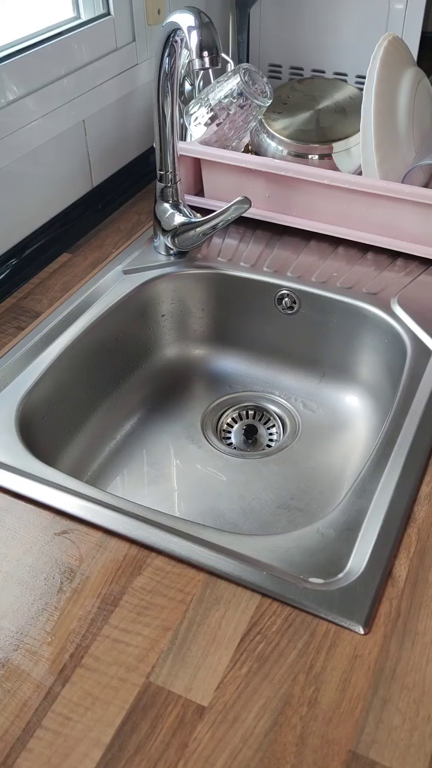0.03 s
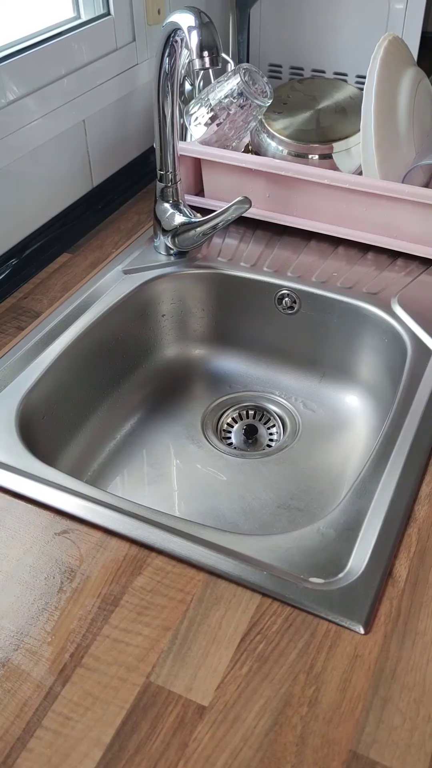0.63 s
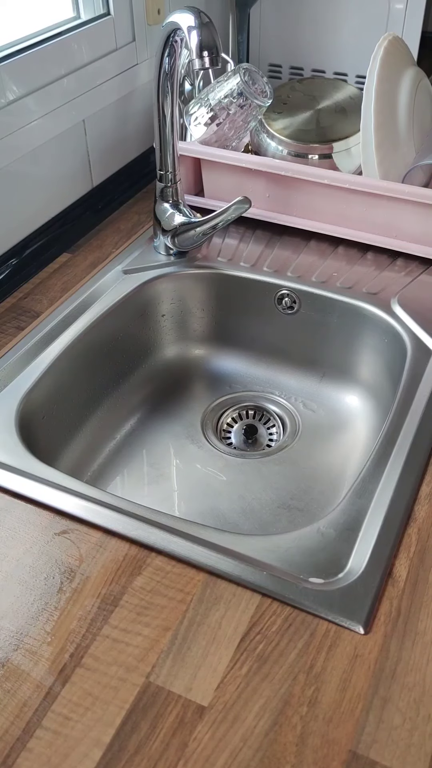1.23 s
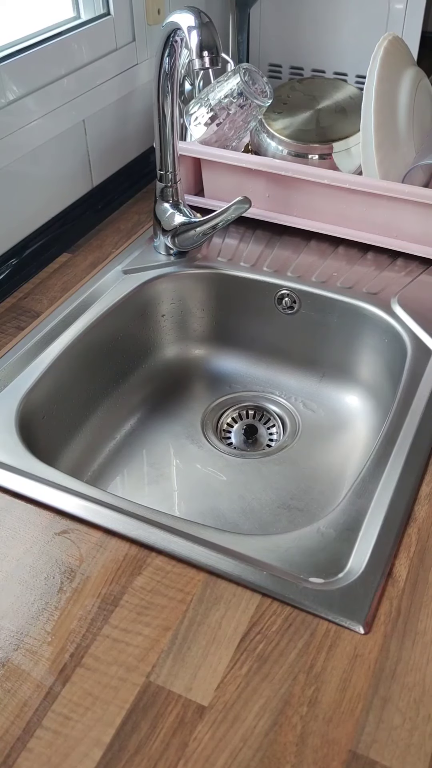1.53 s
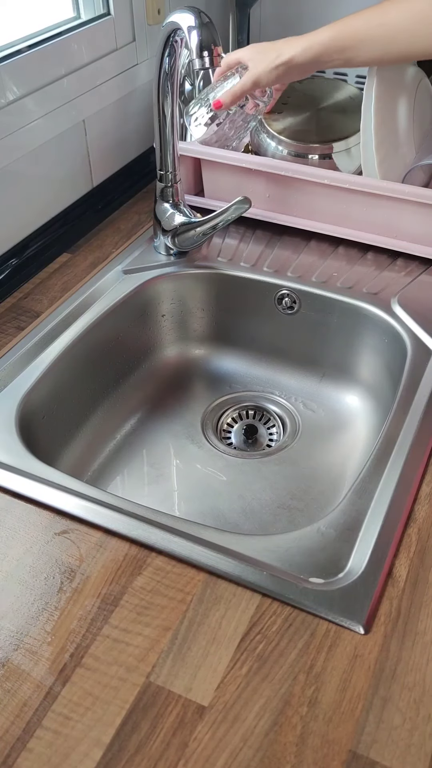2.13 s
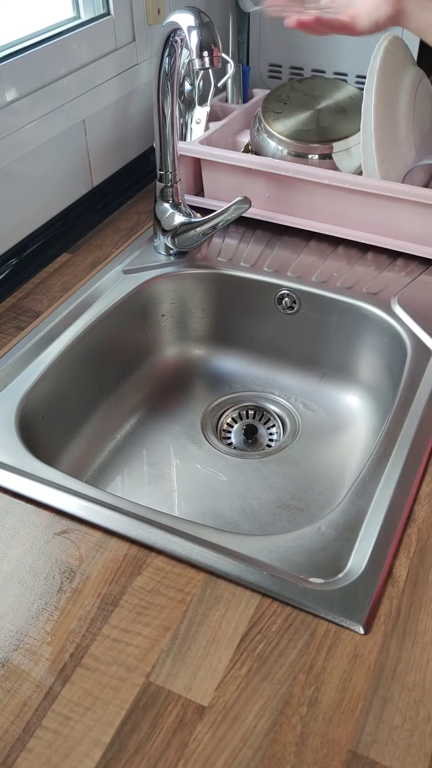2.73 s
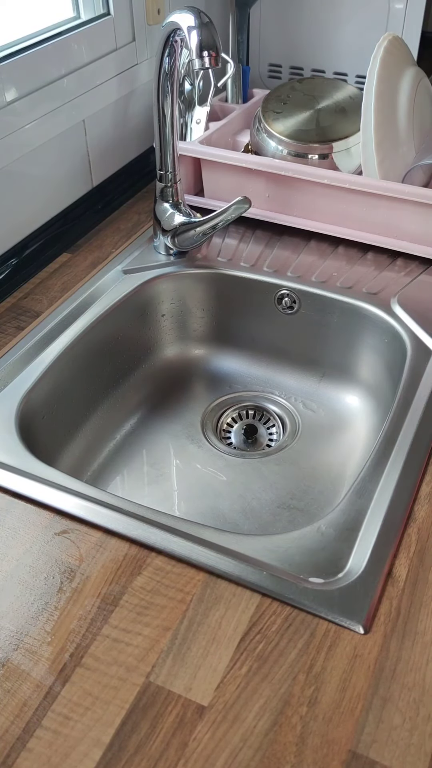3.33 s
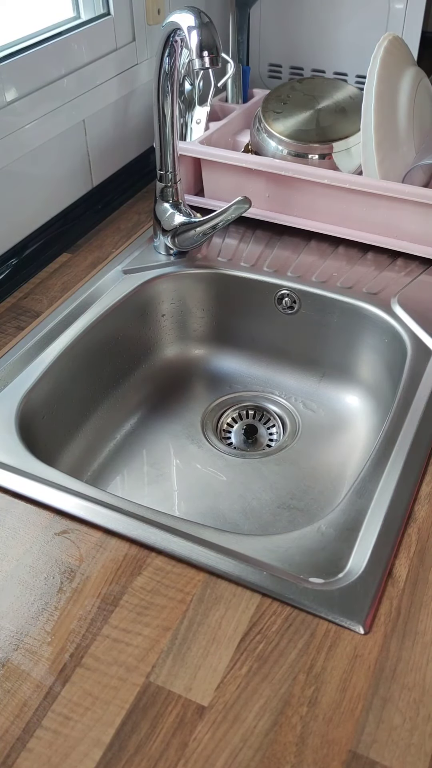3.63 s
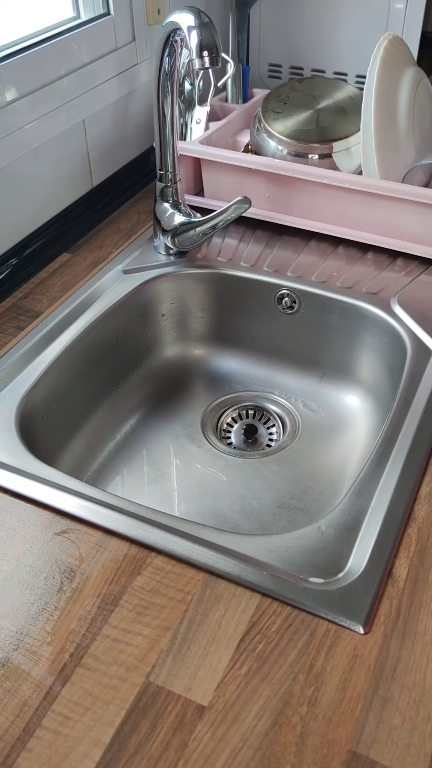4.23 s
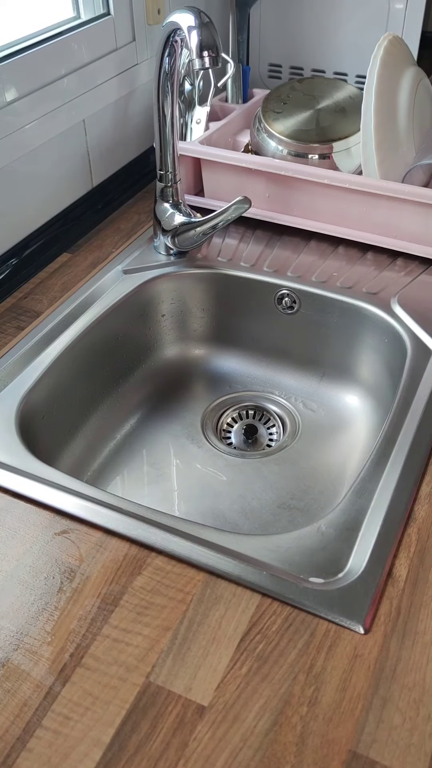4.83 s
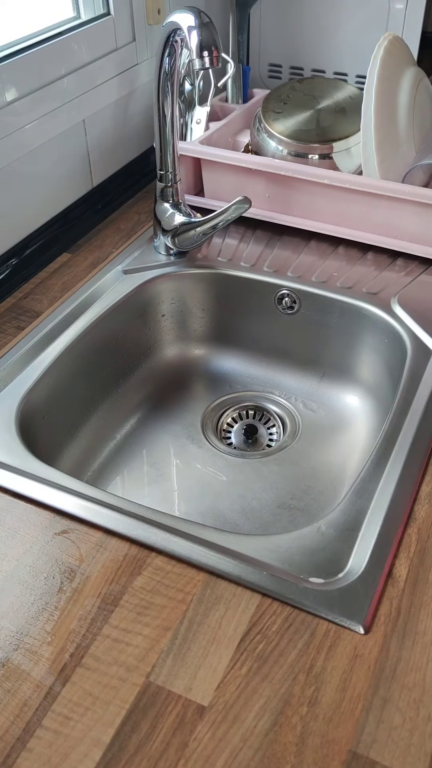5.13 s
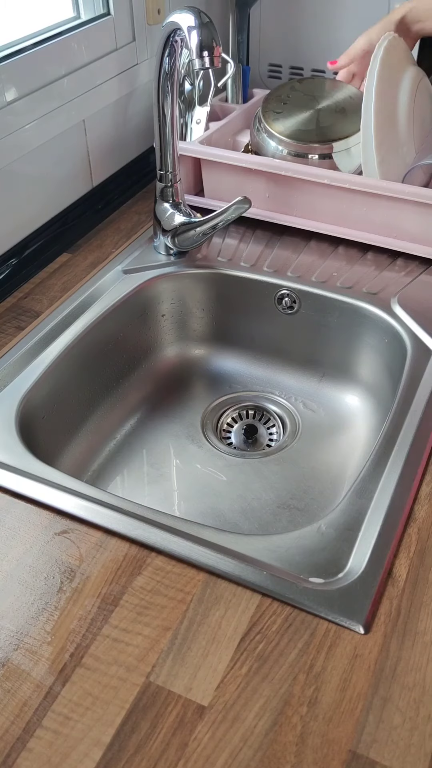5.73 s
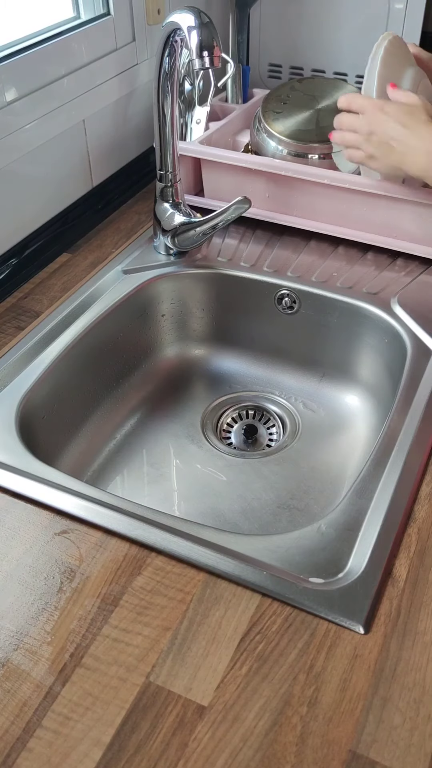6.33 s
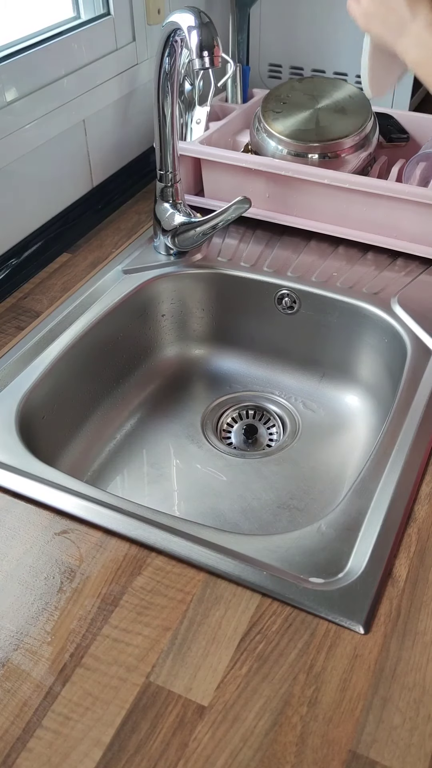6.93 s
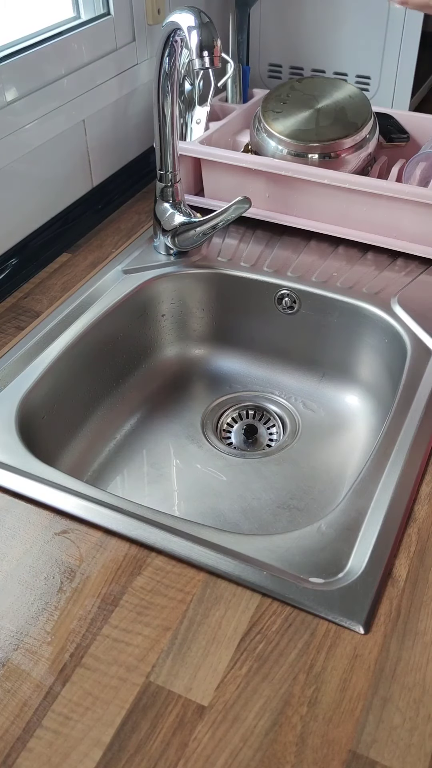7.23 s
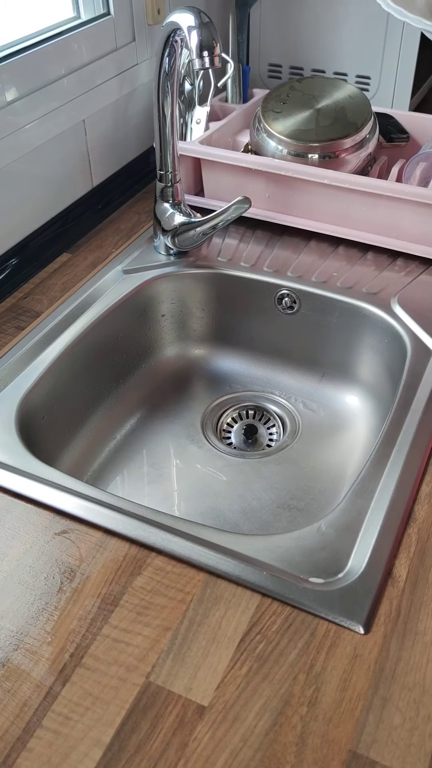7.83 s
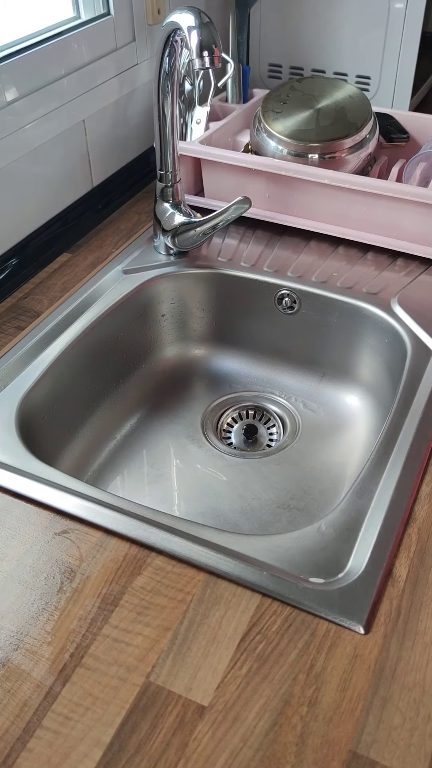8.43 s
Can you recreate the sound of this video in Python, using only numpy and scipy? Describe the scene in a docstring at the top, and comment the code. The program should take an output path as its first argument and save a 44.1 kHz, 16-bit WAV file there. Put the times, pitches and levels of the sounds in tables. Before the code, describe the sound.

A small tiled kitchen is heard close up in stereo, with soft room noise and a faint, steady fridge hum throughout. At about 0.6 seconds a cupboard door thumps slightly to the right, and cups and a wire shelf jingle and rattle until 1.3 seconds. At 2.3 seconds a plastic drainer gives a light knock as a glass is lifted out. After a pause, a shelf board thuds at 4.1 seconds, and at 4.3 the glass is set down with a quick, bright, ringing chatter, the loudest sound. From about 6.3 seconds, slightly to the left, a plate scrapes and bumps its way out of the drainer, and its rim clacks sharply at 7 seconds. A faint scrape and a light tap follow around 7.4 seconds. The plate clacks onto a stack at 7.8 seconds and settles with a small knock just after 8.

```python
"""A small tiled kitchen, beside the steel sink, on a stereo pair: a plastic drainer is being emptied.
To the right a cupboard door thumps, cups and a wire shelf jingle. A glass is lifted out and chatters,
ringing, on a shelf board. To the left a plate scrapes out of the drainer, its rim clacks, it is tapped
in the hand and laid on a stack. Each blow is a short knock plus ringing modes. A fridge hums faintly."""
import sys
import numpy as np
from scipy import signal
from scipy.fft import rfft, irfft, next_fast_len
from scipy.io import wavfile

SR = 44100
rng = np.random.default_rng(int(sys.argv[2]) if len(sys.argv) > 2 else 0)


def to_wav(s):
    """Save 16-bit WAV."""
    ch = np.atleast_2d(s).T  # columns
    pcm = np.round(np.clip(ch, -1, 1) * 32767)  # PCM
    wavfile.write(sys.argv[1], SR, pcm.astype(np.int16))


N = 382788
SCENE_FFT, SIZE = next_fast_len(N, real=True) // 2 * 2, 49152  # SIZE holds one blow and its tail
T, HZ = np.arange(SIZE) / SR, np.fft.rfftfreq(SIZE, 1 / SR) + 1
SIDES = np.array([[1], [-1]])  # left, right

def undb(db):
    """Decibels to gain."""
    return 10 ** (np.asarray(db) / 20)

def colour(points, hz):
    """Gain at hz of a spectrum of (Hz, dB) points."""
    f, db = np.transpose(points)
    return undb(np.interp(np.log(hz), np.log(f), db))

def causal(points):
    """Log response of a body that answers only after it is struck."""
    cepstrum = irfft(np.log(colour(points, HZ)))
    cepstrum[1:SIZE // 2] *= 2
    cepstrum[SIZE // 2 + 1:] = 0
    return rfft(cepstrum)

def likeness(hz, spacing_m=0.17):
    """Two microphones hear a room alike in the bass, hardly at all above."""
    return .95 * np.sinc(2 * hz * spacing_m / 343)

def stereo(mid, side, hz):
    """Left and right from unrelated mid and side."""
    return mid * np.sqrt(1 + likeness(hz)) + side * np.sqrt(1 - likeness(hz)) * SIDES

def diffuse(size):
    """Spectrum of noise reaching the microphones from all sides."""
    mid, side = rfft(rng.standard_normal((2, size)))
    return stereo(mid, side, np.fft.rfftfreq(size, 1 / SR))

# Room tone: (frequency [Hz], relative level [dB])
ROOM_TONE = [(12, -29.5), (20, 0.5), (70, -13.5), (92, -10), (133, -11), (250, -18.5), (380, -16.5),
             (597, -20), (881, -24), (1010, -25.5), (2500, -33.5), (3600, -31.5), (4310, -34.5),
             (6300, -35), (7900, -32.5), (9500, -39), (15500, -40)]
def room_air(level_db=-57.5):
    """Steady air all round the microphones."""
    air = irfft(diffuse(SCENE_FFT) * colour(ROOM_TONE, np.fft.rfftfreq(SCENE_FFT, 1 / SR) + 0.12))[:, :N]
    return undb(level_db) * air / air.std()

# Hum and compressor whine: (frequency [Hz], relative level [dB])
FRIDGE_TONES = [(97, -70.5), (393, -75), (495, -89.5), (592, -78), (985, -79.5), (3601, -80.5), (3650, -82),
                (3747, -83), (4980, -87), (6115, -88.5)]
def fridge(gain_db=2):
    """Even tones reach each microphone in their own phase."""
    t, hum = np.arange(N) / SR, 0
    for hz, db in FRIDGE_TONES:
        phase = 2 * np.pi * rng.random() + np.arccos(likeness(hz)) / 2 * SIDES
        hum += undb(db + gain_db) * np.sqrt(2) * np.sin(2 * np.pi * hz * t + phase)
    return hum

# Reverberation off the tiles: (frequency [Hz], T60 [s])
ROOM_DECAY = [(150, 0.61), (400, 0.6), (1000, 0.76), (2200, 0.7), (4000, 0.75), (8000, 0.54), (14000, 0.23)]
def kitchen(direct_db, lag_ms, build_s=0.002, sparse_s=0.037):
    """Path to the microphones: direct sound, reflections, dense tail. Positive lag is to the right."""
    noise, (centres, t60s) = diffuse(SIZE), np.transpose(ROOM_DECAY)
    bands = [np.interp(np.log(HZ), np.log(centres), row) for row in np.eye(len(centres))]
    tail = sum(irfft(noise * band) * undb(-60 * T / t60) for band, t60 in zip(bands, t60s))
    reflections = np.exp(.7 * np.repeat(rng.standard_normal(SIZE // 32), 32) * np.exp(-T / sparse_s))
    tail *= reflections * (1 - np.exp(-T / build_s))
    delay_s = (1 + SIDES * lag_ms / 2) / 1000
    direct = np.sinc((T - delay_s) * SR) * (T < 2 * delay_s)
    return rfft(tail / np.sqrt(np.sum(tail ** 2) / 2) + undb(direct_db) * direct)

def unit(x):
    """Give each channel the energy of 0.1 s at full level."""
    return x / np.sqrt(np.sum(x ** 2, axis=-1, keepdims=True) * 10 / SR)

def ringing(modes, room, t60_s):
    """Each mode as heard in the room; higher ones die sooner."""
    rings = []
    for hz, _ in modes:
        t60 = t60_s * np.sqrt(modes[0][0] / hz)
        push = 1 - np.exp(-T * hz)  # a mode takes about a cycle to get going
        mode = push * np.sin(2 * np.pi * hz * T) * undb(-60 * T / t60)
        left, right = unit(irfft(room * rfft(mode)))
        rings.append(stereo(unit(left + right), unit(left - right), hz))
    return np.array(rings)

def spot(modes, favoured_hz, lift_db=10, reach_octaves=.2, scatter_db=1.2):
    """Mode gains for one blow: the spot it lands on may favour some."""
    hz, db = np.transpose(modes)
    nearness = sum(np.exp(-(np.log2(hz / f) / reach_octaves) ** 2) for f in favoured_hz)
    return undb(db + lift_db * nearness + scatter_db * rng.standard_normal(len(modes)))

def struck(hits, modes, body, room, knock_s, t60_s):
    """A blow knocks the body and rings its modes; harder contact is brighter."""
    out = np.zeros((2, N + SIZE))
    rings, shell = ringing(modes, room, t60_s), room * np.exp(causal(body))
    tilt = causal([(200, 0), (12800, 6)])  # 1 dB per octave
    for s, knock_db, ring_db, bright, *favoured_hz in hits:
        contact = np.exp(bright * tilt)
        burst = rng.standard_normal(SIZE) * np.exp(-T / knock_s)
        knock = irfft(shell * contact * rfft(burst))
        ring = irfft(rfft(np.tensordot(spot(modes, favoured_hz), rings, 1)) * contact)
        start = int((s - .001) * SR)
        out[:, start:start + SIZE] += undb(knock_db) * unit(knock) + undb(ring_db) * unit(ring)
    return out[:, :N]

def bounce(hits, gap_s, count=2, brighten=1.65):
    """What lands hops on at even gaps, each contact weaker and brighter."""
    return [(s + k * gap_s, knock - k * loss, ring - k * loss, bright + k * brighten, *favoured_hz)
            for s, knock, ring, bright, loss, *favoured_hz in hits for k in range(count)]

# Door blows: (time [s], knock [dB], ring [dB], tilt [dB/octave], bounce loss [dB])
DOOR_BLOWS = [(.607, -38, -39.5, -2.5, 12), (.620, -33, -38, -2.3, 9.7), (.656, -36.5, -48, -0.39, 14)]
# Its modes and knock spectrum: (frequency [Hz], level [dB])
DOOR_RING = [(119, -17), (164, -13), (325, -6), (381, -1), (566, -3), (661, -6)]
DOOR_KNOCK = [(40, -12), (90, -11), (150, -8), (270, -10.5), (375, 10.5), (480, -6.5), (650, 5.5),
              (900, -10), (1350, -8.5), (1900, -16.5), (3000, -20.5), (6000, -53)]
def cupboard_door(room):
    """The door thumps; its low modes die fast."""
    return struck(bounce(DOOR_BLOWS, .02), DOOR_RING, DOOR_KNOCK, room, knock_s=.004, t60_s=.04)

# Cup and wire blows: (time [s], knock [dB], ring [dB], tilt [dB/octave], bounce loss [dB])
CUP_BLOWS = [(.691, -39.5, -34.5, -0.91, 5)]
WIRE_BLOWS = [(.969, -43, -51.5, -2, 5.7), (1.122, -37, -42.5, -2, 2.7), (1.24, -49, -52, -11, 7.4)]
# Their modes and shared knock spectrum: (frequency [Hz], level [dB])
CUP_RING = [(660, -12), (1701, -20), (2471, -22), (4107, -13), (4194, 0), (7375, -9), (8123, -18),
            (9695, -23), (11340, -18), (12860, -28)]
WIRE_RING = [(2044, -13), (2272, -10), (4210, -4), (4522, 0), (4610, -5), (4856, -9), (7461, -8),
             (7919, -4), (11632, -12), (12920, -16)]
WIRE_KNOCK = [(120, -4), (240, -11), (400, -6.5), (700, -1), (1400, 1), (2200, 7), (3600, -8.5), (4500, 4),
              (6200, -25), (7800, 2.5), (9100, -51), (9900, -12), (10600, -29), (11500, -24), (14000, -41)]
def cups_and_shelf(room):
    """Cups and wire shelf jingle in quick bounces."""
    cups = struck(bounce(CUP_BLOWS, .013, count=3), CUP_RING, WIRE_KNOCK, room, knock_s=.043, t60_s=.21)
    rattle = bounce(WIRE_BLOWS, .017, count=4)
    return cups + struck(rattle, WIRE_RING, WIRE_KNOCK, room, knock_s=.0055, t60_s=.08)

# Board blows: (time [s], knock [dB], ring [dB], tilt [dB/octave], bounce loss [dB])
BOARD_BLOWS = [(.982, -54, -52, 6.5, 25), (1.127, -46.5, -66, -3.5, 1.5), (4.121, -39.5, -48, -0.5, 16),
               (4.380, -38.5, -53, 8, 11)]
# Its knock spectrum: (frequency [Hz], level [dB])
BOARD_KNOCK = [(40, -21), (90, -6), (140, 7), (250, -12.5), (400, 8), (600, -5.5), (900, -15), (1500, -26),
               (4000, -57.5), (15000, -90.5)]
def shelf_board(room):
    """The board thuds with the same modes as the door."""
    return struck(bounce(BOARD_BLOWS, .014), DOOR_RING, BOARD_KNOCK, room, knock_s=.006, t60_s=.12)

# Glass blows: (time [s], knock [dB], ring [dB], tilt [dB/octave], favoured mode [Hz])
GLASS_BLOWS = [(2.321, -79, -47, -4, 3350), (4.300, -30, -21, 1.5, 1700), (4.310, -29, -31.5, 1, 9000),
               (4.330, -28, -17.5, -0.5, 1724), (4.347, -31, -26, 4, 7289), (4.367, -33, -24.5, -1, 4108),
               (4.390, -35.5, -26.5, -3, 2407)]
# Its modes and knock spectrum: (frequency [Hz], level [dB])
GLASS_RING = [(1558, -21), (1700, -3), (2335, -19), (2503, -15), (3435, -27), (4108, -11), (5345, -17),
              (7068, -21), (7289, -8.5), (8084, -19), (9004, -22), (10184, -22), (11209, -21), (12758, -24),
              (14170, -29)]
GLASS_KNOCK = [(130, -3.5), (250, -10), (570, -0.5), (820, -8), (1100, -3.5), (1700, 7.5), (2100, 0),
               (3500, -6.5), (6200, -12.5), (7800, 0.5), (8800, -12.5), (10000, -14), (11800, -29.5),
               (15500, -44.5)]
def glass(room):
    """A hand-held glass rings when lifted and chatters when set down."""
    return struck(GLASS_BLOWS, GLASS_RING, GLASS_KNOCK, room, knock_s=.0026, t60_s=.18)

# Drainer blows: (time [s], knock [dB], ring [dB], tilt [dB/octave], bounce loss [dB])
RACK_BLOWS = [(2.321, -41, -43.5, 0.3, 14)]
# Its modes and knock spectrum: (frequency [Hz], level [dB])
RACK_RING = [(371, 0), (452, -1), (685, -5), (1066, -11), (1300, -8)]
RACK_KNOCK = [(50, 0.5), (130, 6.5), (220, -2.5), (400, 2), (850, -1.5), (1400, 1.5), (2400, -8.5),
              (4000, -16.5), (7500, -13.5), (9300, -19), (9900, -7.5), (10600, -22), (15000, -28)]
def drainer_knock(room):
    """The plastic knocks as the glass leaves it."""
    return struck(bounce(RACK_BLOWS, .015), RACK_RING, RACK_KNOCK, room, knock_s=.0019, t60_s=.068)

# Pulls along the drainer's ribs: (time [s], length [s], peak level [dB])
PLATE_PULLS = [(6.34, 0.16, -53.5), (6.565, 0.082, -48.5), (6.729, 0.079, -37.5), (7.187, 0.24, -55)]
# Spectrum of plate on drainer: (frequency [Hz], level [dB])
PLATE_KNOCK = [(30, -4), (55, -18), (85, 2), (170, -0.5), (260, 1.5), (430, -2.5), (520, -11), (900, 0.5),
               (1200, -9), (2200, -13.5), (3200, -15.5), (7300, -15.5), (9500, -32), (15000, -44)]
def plate_scrape(room, slips_per_s=500, scatter_db=4, rise_db_per_s=10, fall_db_per_s=397):
    """China sticks and slips on plastic in dense clicks; a low rumble swells with the scrape."""
    t, force = np.arange(N) / SR, 0
    for s, length, db in PLATE_PULLS:
        past_peak_s = t - s - length
        force += (t > s) * undb(db - np.maximum(-rise_db_per_s * past_peak_s, fall_db_per_s * past_peak_s))
    slips = (rng.random(N) < slips_per_s / SR) * rng.choice([-1, 1], N)
    slips = slips * undb(scatter_db * rng.standard_normal(N))
    click = irfft(room * np.exp(causal(PLATE_KNOCK)))
    click /= np.sqrt(np.sum(click ** 2) / 2)
    scrape = signal.fftconvolve((force * slips / slips.std())[None], click, axes=1)[:, :N]
    low_band = signal.butter(2, [44, 72], "bandpass", fs=SR, output="sos")
    rumble = signal.sosfilt(low_band, rng.standard_normal(N))
    return scrape + undb(-5) * force * rumble / rumble.std()

# Rim and plate blows: (time [s], knock [dB], ring [dB], tilt [dB/octave], bounce loss [dB])
RIM_BLOWS = [(6.444, -58, -58, -2.5, 16), (6.98, -30.5, -34, -1.5, 7.7)]
PLATE_BLOWS = [(6.606, -44.5, -44, 0.25, 33), (6.706, -43.5, -46.5, 0.41, 4.4)]
# Rim modes and knock spectrum: (frequency [Hz], level [dB])
RIM_RING = [(781, -6), (946, -3), (2099, -3), (2784, -7), (3480, -3), (6325, -12), (6880, -3), (7892, -5),
            (10540, -14)]
RIM_KNOCK = [(130, -13), (220, -23), (371, 6), (450, -19.5), (677, 6.5), (974, 2.5), (1300, -5), (2800, -3),
             (4200, -11), (7090, 2.5), (9500, -8), (15500, -31)]
def plate_clacks(room):
    """The plate bumps the drainer and its rim clacks."""
    bumps = struck(bounce(PLATE_BLOWS, .021), RACK_RING, PLATE_KNOCK, room, knock_s=.0042, t60_s=.095)
    return bumps + struck(bounce(RIM_BLOWS, .013), RIM_RING, RIM_KNOCK, room, knock_s=.0017, t60_s=.051)

# Taps: (time [s], knock [dB], ring [dB], tilt [dB/octave], bounce loss [dB], favoured mode [Hz])
TAP_BLOWS = [(6.842, -39, -39.5, 0, 6, 673), (7.423, -41, -44.5, -0.08, 8.2, 920)]
# Held plate's modes and knock spectrum: (frequency [Hz], level [dB])
TAP_RING = [(673, -1), (910, -10), (1922, -8), (2180, -4), (2293, -2), (2400, -5), (7311, -14)]
TAP_KNOCK = [(250, -21), (520, -14), (850, 5), (1250, -5), (2300, 6.5), (3100, -11.5), (4300, -15),
             (7200, -7.5), (8000, -17), (14000, -54)]
def plate_taps(room):
    """Tapped in the hand, the plate rings briefly."""
    return struck(bounce(TAP_BLOWS, .005), TAP_RING, TAP_KNOCK, room, knock_s=.0016, t60_s=.073)

# Stack blows: (time [s], knock [dB], ring [dB], tilt [dB/octave], bounce loss [dB])
STACK_BLOWS = [(7.832, -31, -34, -0.55, 19), (8.025, -50.5, -66, -1.3, 13), (8.078, -40, -62, -0.25, 37)]
# Its modes and knock spectrum: (frequency [Hz], level [dB])
STACK_RING = [(1308, -7), (1927, -7), (2175, -4), (2379, -11), (2713, -11), (3973, -6), (4958, -15),
              (5281, -14), (6325, -14), (6492, -10), (7483, -7), (8850, -18), (9658, -20), (10480, -18)]
STACK_KNOCK = [(200, -41), (480, -9), (800, 1), (1300, 0), (1470, -5), (2100, 5), (2900, -5.5),
               (4400, -14.5), (6500, -5.5), (7450, -3.5), (8200, -17), (10500, -18), (11300, -52),
               (15000, -37)]
def plate_stack(room):
    """The plate lands on the stack and settles."""
    return struck(bounce(STACK_BLOWS, .0094), STACK_RING, STACK_KNOCK, room, knock_s=.0059, t60_s=.045)

# Microphone port balance: (frequency [Hz], left minus right [dB])
PORT_BALANCE = [(1600, 0.5), (2300, 1), (4200, -5.5), (5300, -5.5), (7200, 0), (8200, 10), (9000, 9),
                (10200, -8), (11300, -7.5), (14000, -14.5)]
def microphone_ports(x):
    """The two ports resonate differently, tipping each frequency left or right."""
    ratio = colour(PORT_BALANCE, np.fft.rfftfreq(SCENE_FFT, 1 / SR) + 1)
    gains = np.array([ratio, np.ones_like(ratio)]) * np.sqrt(2 / (1 + ratio ** 2))
    return irfft(rfft(x, SCENE_FFT) * gains)[:, :N]

def scene():
    """The drainer is close, a little left of the microphones; the cupboard is off to the right."""
    cupboard = kitchen(direct_db=-2, lag_ms=.14)
    shelf = kitchen(direct_db=-16, lag_ms=.13)
    shelf_front = kitchen(direct_db=-9.5, lag_ms=.081)
    drainer = kitchen(direct_db=-11.5, lag_ms=-.14)
    stack = kitchen(direct_db=-4, lag_ms=-.24)
    hand = kitchen(direct_db=-12, lag_ms=-.21)
    dishes = (cupboard_door(cupboard) + cups_and_shelf(shelf) + shelf_board(cupboard)
              + glass(shelf_front) + drainer_knock(drainer)
              + plate_scrape(drainer) + plate_clacks(drainer) + plate_taps(hand) + plate_stack(stack))
    return microphone_ports(dishes) + room_air() + fridge()

def record(dry):
    """The recorder cuts the treble above 15.8 kHz."""
    return signal.sosfilt(signal.ellip(10, .2, 80, 15800, fs=SR, output="sos"), dry)

dry = scene()
out = record(dry)
to_wav(out)
```